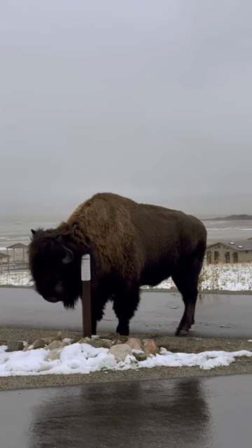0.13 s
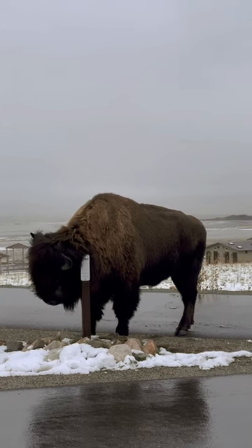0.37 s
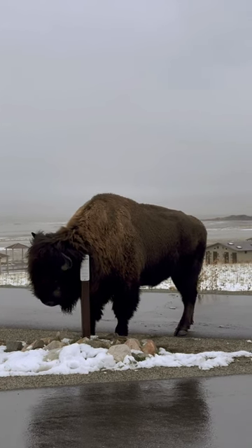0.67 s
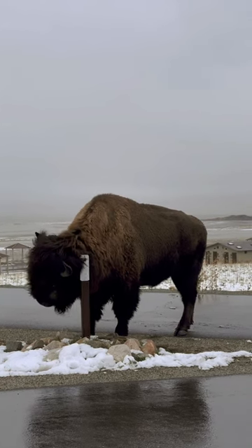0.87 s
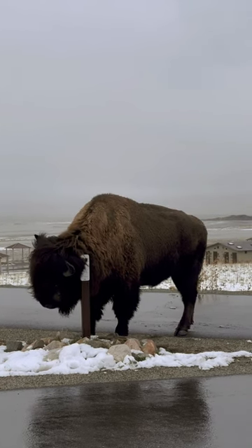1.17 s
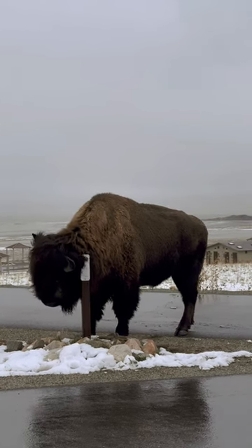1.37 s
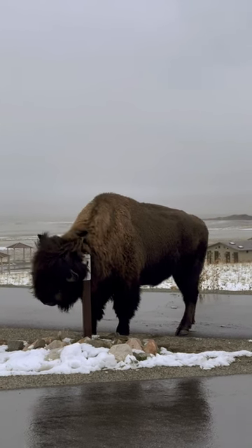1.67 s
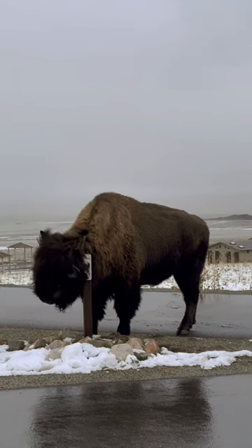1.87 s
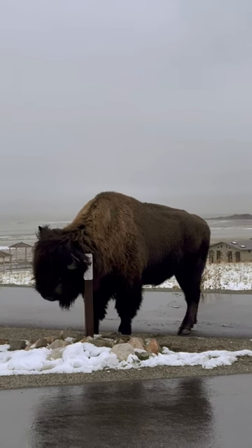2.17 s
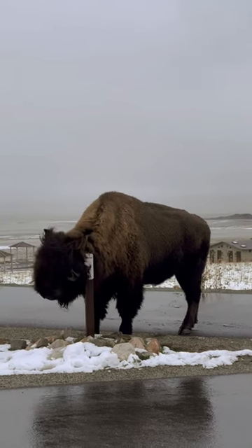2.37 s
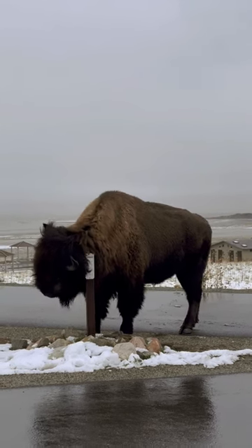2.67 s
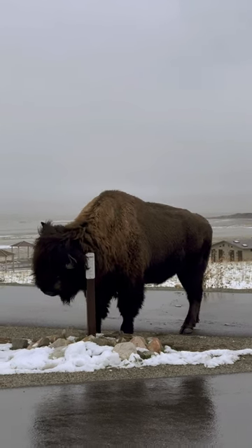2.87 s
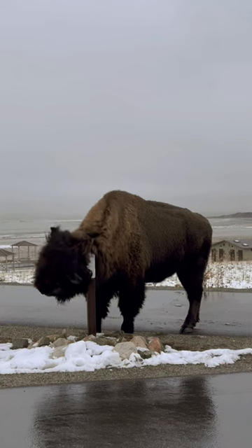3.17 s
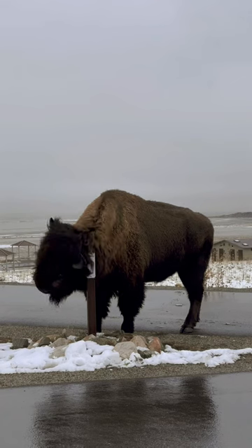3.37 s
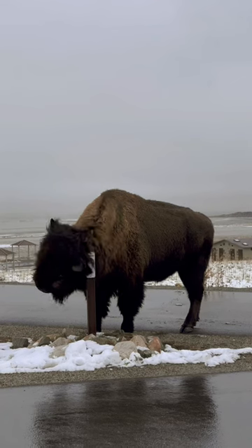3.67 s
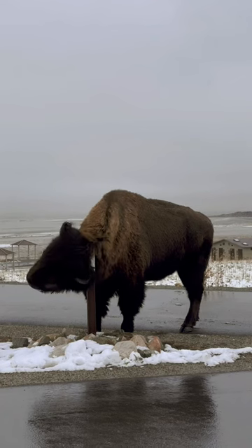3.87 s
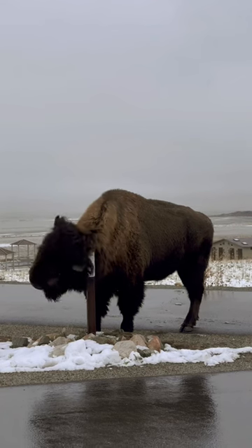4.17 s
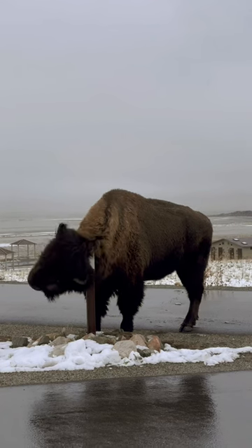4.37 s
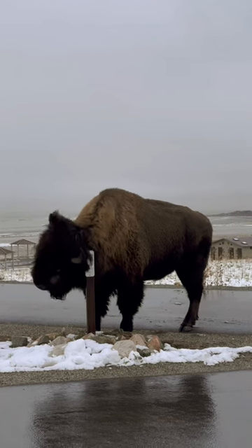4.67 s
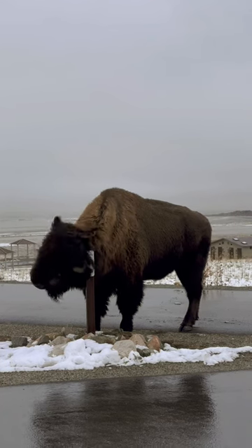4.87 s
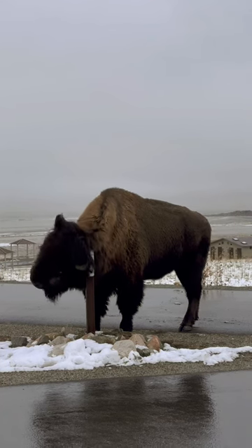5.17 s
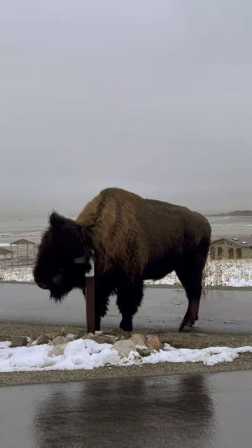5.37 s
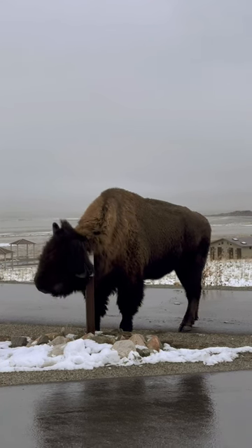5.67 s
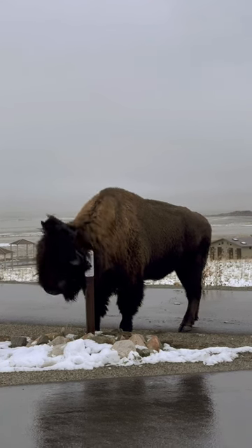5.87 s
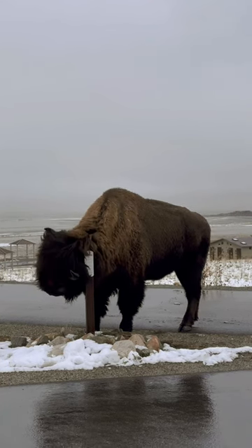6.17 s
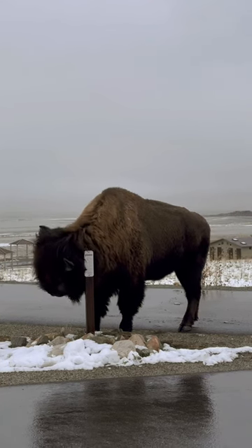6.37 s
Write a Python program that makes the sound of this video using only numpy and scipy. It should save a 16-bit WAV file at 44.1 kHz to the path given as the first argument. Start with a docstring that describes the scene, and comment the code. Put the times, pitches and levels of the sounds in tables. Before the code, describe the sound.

Low engine idle inside a car speeds up into a stronger pulsing drone, with faint fur rustles and two small horn ticks.

```python
"""Idling car and a rubbing bison

A four-cylinder car idles at a wet roadside, heard from inside; half way through, the engine speeds up.
A hum close to three times the firing rate beats with the engine's tone there; both swell into a
throbbing boom. Panels rumble, valves clatter, fuel injectors tick and a loose part rattles faintly.
Outside, a bison rubs its head on a post: its fur rustles softly and a horn catches with two small ticks."""
import sys
import numpy as np
from scipy import signal
from scipy.fft import rfft, irfft, next_fast_len
from scipy.io import wavfile
from scipy.ndimage import uniform_filter1d

SR = 44100
rng = np.random.default_rng(int(sys.argv[2]) if len(sys.argv) > 2 else 0)


def wav_out(sig):
    """Save sig, one row per channel (or a flat mono array), as 16-bit PCM at SR to the path in sys.argv[1]."""
    wavfile.write(sys.argv[1], SR, np.round(np.clip(np.atleast_2d(sig).T, -1, 1) * 32767).astype(np.int16))


N = 287973
TIME = np.arange(N) / SR
FFT_SIZE = next_fast_len(N)
HZ = np.maximum(np.arange(FFT_SIZE // 2 + 1) * SR / FFT_SIZE, 1)
SLOW_IDLE, FAST_IDLE = 21.7, 24.9   # firings per second

# How strong each cylinder is, in the order they fire: (level [dB])
CYLINDER_DB = [0.57, 3.2, 0.24, 3.3]


def from_db(db):
    """Turn decibels into a number to multiply by."""
    return 10 ** (np.asarray(db) / 20)


def rms_one(x):
    """Scale a signal so that its average strength (rms) is 1."""
    return x / np.sqrt(np.mean(x ** 2) + 1e-20)


def white():
    """White noise: every pitch at equal strength."""
    return rng.standard_normal(N)


def drift(turns_per_s):
    """A smooth random wander, about 1 in size."""
    points = rng.standard_normal(400)
    return rms_one(np.interp(TIME * turns_per_s, np.arange(len(points)), points))


def grain(samples):
    """A fast random flicker, about 1 in size, that makes a sound rough."""
    return rms_one(uniform_filter1d(white(), size=samples))


def swell(middle_s, length_s):
    """A bell-shaped rise and fall of height 1."""
    return np.exp(-2 * ((TIME - middle_s) / length_s) ** 2)


def lift_at(hz, resonances):
    """How many dB the resonances add or take away at these pitches."""
    return sum(lift / (1 + (2 * (hz - centre) / width) ** 2) for centre, width, lift in resonances)


def coloured(x, spectrum, resonances=()):
    """Give x a tone colour with resonances on top, then scale it to strength 1."""
    hz, db = np.transpose(spectrum)
    shape_db = np.interp(np.log(HZ), np.log(hz), db) + lift_at(HZ, resonances)
    shape_db -= 24 * np.log2(np.maximum(HZ / hz[-1], 1))   # fade away above the last row
    return rms_one(irfft(rfft(x, FFT_SIZE) * from_db(shape_db), FFT_SIZE)[:N])


def per_firing(firings, cylinder_db, delay, width):
    """One smooth burst per firing, as strong as its cylinder; delay and width are in firings."""
    number = np.round(firings - delay)
    strength = from_db(cylinder_db)[number.astype(int) % len(cylinder_db)]
    return strength * np.exp(-.5 * ((firings - delay - number) / width) ** 2)


def tone(cycles, level_db, waver_db):
    """A pure tone whose loudness wavers a little."""
    return np.sqrt(2) * from_db(level_db + waver_db * drift(7)) * np.cos(2 * np.pi * cycles)


def exhaust(firings, speed, effort, smear_cycles=0.0888):
    """At slow idle the low engine tones line up into one thud per firing; faster, the cabin smears it."""
    # Engine tones before the cabin shapes them:
    # (pitch [times the firing rate], level at slow idle [dB], level at fast idle [dB])
    engine_tones = [(1, -65.5, -51.5), (2, -55.5, -62), (4, -49, -49.5), (5, -44.5, -48.5),
                    (6, -61.5, -61.5), (7, -67.5, -56.5), (7.5, -66, -59.5), (8, -67, -64),
                    (10.5, -69.5, -66.5), (12, -71.5, -66), (12.25, -73.5, -60), (13.5, -65.5, -86),
                    (14, -69.5, -66.5), (16.03, -66, -79.5), (18.06, -84, -75.5), (24.02, -77.5, -88)]
    # Booms and dead spots of the cabin that the tones slide through: (pitch [Hz], width [Hz], lift [dB])
    cabin_booms = [(45.4, 0.98, -12), (48.35, 2.6, 13), (96.5, 2.3, -10), (116.5, 6.7, -7), (159.6, 4.3, 6),
                   (379.8, 24, 11)]
    out = np.zeros(N)
    for multiple, slow_db, fast_db in engine_tones:
        multiple = round(multiple * len(CYLINDER_DB)) / len(CYLINDER_DB)   # repeats every four firings
        lag = smear_cycles * effort * (min(multiple, 8) - 3) ** 2
        level_db = slow_db + (fast_db - slow_db) * effort + lift_at(multiple * speed, cabin_booms)
        out += tone(multiple * firings - lag, level_db, waver_db=1.2)
    return out


def throb(firings, speed, effort):
    """The tone at three times the firing rate overtakes a hum; the two add and cancel in turn."""
    hum_hz = 68.57 + 1.004 * (speed - SLOW_IDLE)
    hum_cycles = .93 + np.cumsum(hum_hz) / SR
    boom = effort ** 3.4   # the swell comes late, close to the fast idle
    engine_tone = tone(3 * firings, level_db=-53.5 + 12 * boom, waver_db=.5)
    hum = tone(hum_cycles, level_db=-49 + 6 * boom, waver_db=.5)
    return engine_tone - hum


def rumble(firings, repeat_db=-1.5):
    """Each firing shakes the body panels; part of the shake repeats every four firings."""
    # Tone colour of the shaking panels: (pitch [Hz], relative level [dB])
    spectrum = [(18, -23), (25, -12.5), (40, -2), (65, 3), (95, 1.5), (130, 2.5), (170, -0.5), (215, -5),
                (270, -6), (345, -7), (400, -14.5), (480, -20), (800, -43)]
    # Resonances of the cabin: (pitch [Hz], width [Hz], lift [dB])
    resonances = [(297, 23, 11), (346, 14, -2), (442, 34, 4.5)]
    pattern = rng.standard_normal(256)
    places = np.arange(len(pattern)) / len(pattern)
    repeating = rms_one(np.interp(firings / len(CYLINDER_DB), places, pattern, period=1))
    bursts = 1 + per_firing(firings, CYLINDER_DB, delay=0.32, width=0.45)
    random_shake = coloured(bursts * white(), spectrum, resonances)
    repeated_shake = coloured(bursts * repeating, spectrum, resonances)
    return rms_one(random_shake + from_db(repeat_db) * repeated_shake)


def clatter(firings, pulsing=0.36, flutter_db=0.75, grain_db=1.2):
    """Valves and belts make a grainy rush that rings in the engine bay and lifts at each firing."""
    # Tone colour of the valves and belts: (pitch [Hz], relative level [dB])
    spectrum = [(200, -9), (500, 1), (700, 2.5), (950, -0.5), (1150, -1.5), (1550, -2.5), (1950, -2),
                (2220, -9.5), (2650, -8.5), (3700, -14.5), (4300, -23.5), (6000, -42.5)]
    # Resonances of the engine bay: (pitch [Hz], width [Hz], lift [dB])
    resonances = [(516.4, 15.5, 12.7), (888, 17, 6), (937, 41, 2.6), (992, 22, 6.4), (1320, 31, 6),
                  (1505, 32, 6.9), (1698, 46, 2.7), (1920, 87, 2.6), (2405, 40, 7), (2626, 97, 2.9),
                  (3180, 78, 1.7), (3800, 120, 2)]
    bursts = 2 + pulsing * per_firing(firings, CYLINDER_DB, delay=0.011, width=0.27)
    roughness = from_db(grain_db * grain(samples=130) + flutter_db * drift(14))
    return coloured(bursts * roughness * white(), spectrum, resonances)


def injectors(firings, effort, idle_db=-87.5, rise_db=2.2, uneven_db=1.1):
    """Each fuel injector gives a thin ringing tick, the nearest loudest; harder as the speed rises."""
    # How strong each injector is, in firing order: (relative level [dB])
    injector_db = [1.5, -5.5, -2.5, -7]
    # Tone colour of a tick: (pitch [Hz], relative level [dB])
    spectrum = [(3000, -12.5), (6500, -12), (8000, -7.5), (9000, -0.5), (9450, -1), (9900, -8),
                (11000, -20)]
    # Where the injectors ring: (pitch [Hz], width [Hz], lift [dB])
    resonances = [(9000, 80, 4), (9296, 41, 8), (9540, 87, 8)]
    bursts = per_firing(firings, injector_db, delay=.12, width=.15)
    bursts *= from_db(uneven_db * drift(18))
    return from_db(idle_db + rise_db * effort) * coloured(bursts * white(), spectrum, resonances)


def hiss():
    """The running car gives off a thin, high hiss."""
    # Tone colour of the hiss: (pitch [Hz], relative level [dB])
    spectrum = [(2000, -15), (4500, -4.5), (5500, -0.5), (7500, 3.5), (9400, 2.5), (10200, -0.5),
                (11300, -11), (13500, -12)]
    # Small peaks in the hiss: (pitch [Hz], width [Hz], lift [dB])
    resonances = [(5400, 36, 2.4), (5650, 60, 2.7), (9000, 190, 2.7)]
    return coloured(white(), spectrum, resonances)


def outdoors():
    """A dull wash of sound from outside; opposite signs left and right make it wide."""
    # Tone colour of the wash: (pitch [Hz], relative level [dB])
    spectrum = [(30, -12.5), (100, -12.5), (200, 5.5), (290, 9.5), (380, 6.5), (550, 4.5), (850, 1.5),
                (1300, -3), (1700, -20), (2500, -60.5), (5000, -23.5)]
    return coloured(white(), spectrum) * np.array([[1], [-1]])


def rattles(length_s=0.0099):
    """A loose part shakes now and then with a short, dry rasp."""
    # Shakes of the loose part: (time [s], level [dB])
    shakes = [(.432, -73), (.80, -74), (1.167, -75), (1.968, -75), (3.217, -75), (4.935, -74)]
    # Tone colour of the rasp: (pitch [Hz], relative level [dB])
    spectrum = [(800, -13), (1800, -13.5), (3500, 10), (4500, -1), (6500, -13), (10000, -14)]
    loudness = sum(from_db(db) * swell(time_s, length_s) for time_s, db in shakes)
    return loudness * coloured(white(), spectrum)


def stroke(start_s, length_s, fade_in_s=0.027, fade_out_s=0.028):
    """The pressure of one rub: it rises to 1, holds and lets go."""
    rise = (TIME - start_s) / fade_in_s
    fall = (start_s + length_s - TIME) / fade_out_s
    return np.clip(.5 + np.minimum(rise, fall), 0, 1)


def rubbing(grain_db=2.5, catch_db=1.0, catches_per_s=45):
    """The bison's coarse fur drags over the post in grainy strokes, catching and slipping."""
    # Strokes of fur on the post: (start [s], length [s], level [dB])
    rubs = [(2.68, 0.1, -79.5), (3.04, .09, -77.5), (3.405, .08, -74.5), (3.673, 0.064, -76),
            (3.75, 0.11, -71.5), (4.615, .11, -76), (4.766, 0.03, -77), (4.91, 0.093, -80),
            (5.43, 0.17, -74.5), (5.73, .2, -84), (6.383, 0.083, -76.5)]
    # Tone colour of the fur: (pitch [Hz], relative level [dB])
    spectrum = [(600, -3), (1200, -1.5), (1900, 7), (2800, 5), (4000, 5.5), (5500, 0.5), (8000, 3),
                (9500, 5), (11000, -17.5), (14000, -30)]
    pressure = sum(from_db(db) * stroke(start_s, length_s) for start_s, length_s, db in rubs)
    roughness = from_db(grain_db * grain(samples=90) + catch_db * drift(catches_per_s))
    return pressure * coloured(roughness * white(), spectrum)


def horn_ticks():
    """A horn catches on the post twice, each time with a narrow ring and a broad crack."""
    # Two rows per catch, ring then crack: (middle [s], length [s], level [dB], pitch [Hz], width [Hz])
    catches = [(3.4195, .003, -58, 3600, 900), (3.4193, .001, -57.5, 8500, 9000),
               (3.695, .014, -68, 5550, 550), (3.695, .012, -63, 2000, 2200)]
    out = np.zeros(N)
    for middle_s, length_s, db, hz, width in catches:
        edges_hz = [hz - width / 2, hz + width / 2]
        band = signal.sosfilt(signal.butter(2, edges_hz, "band", fs=SR, output="sos"), white())
        out += from_db(db) * swell(middle_s, length_s) * rms_one(band)
    return out


def scene(hiss_under_db=-22.5, outdoors_under_db=-7.0):
    """The engine's speed drives the running sounds; the rattles and the bison keep their own times."""
    # How fast the engine runs: (time [s], speed [firings per s])
    speed_curve = [(0, 21.644), (1.4, 21.804), (2.45, 21.504), (3.05, 22.894), (3.8, 23.224), (4.7, 24.9),
                   (5.7, 25.158), (6.53, 25.093)]
    speed = np.interp(TIME, *np.transpose(speed_curve))
    firings = .39 + np.cumsum(speed) / SR   # a running count
    effort = np.clip((speed - SLOW_IDLE) / (FAST_IDLE - SLOW_IDLE), 0, 1)   # 0 slow idle, 1 fast idle
    surge_db = 2 * swell(middle_s=3.9, length_s=0.46)   # one surge as the engine picks up
    rumble_db = -51 + 1.4 * effort + surge_db
    clatter_db = -63 + 2.5 * effort
    car = exhaust(firings, speed, effort) + throb(firings, speed, effort)
    car += from_db(rumble_db) * rumble(firings)
    car += from_db(clatter_db) * clatter(firings) + injectors(firings, effort) + rattles()
    car += from_db(clatter_db + hiss_under_db) * hiss()
    outside = from_db(clatter_db + outdoors_under_db) * outdoors()
    return car + outside + rubbing() + horn_ticks()


def record(dry, cutoff_hz=13800):
    """Two microphone openings hear the treble out of step; the very highest pitches are cut."""
    # How far the left side runs ahead of the right: (pitch [Hz], lead [radians])
    left_lead = [(6200, 0), (8000, 1.05), (10000, 2.0), (11100, 3.1)]
    lead = np.interp(HZ, *np.transpose(left_lead))
    shift = np.exp(.5j * lead * np.array([[1], [-1]]))   # half to each side
    heard = irfft(rfft(dry, FFT_SIZE) * shift, FFT_SIZE)[:, :N]
    return signal.sosfilt(signal.ellip(10, .1, 80, cutoff_hz, fs=SR, output="sos"), heard)


dry = scene()
out = record(dry)
wav_out(out)
```